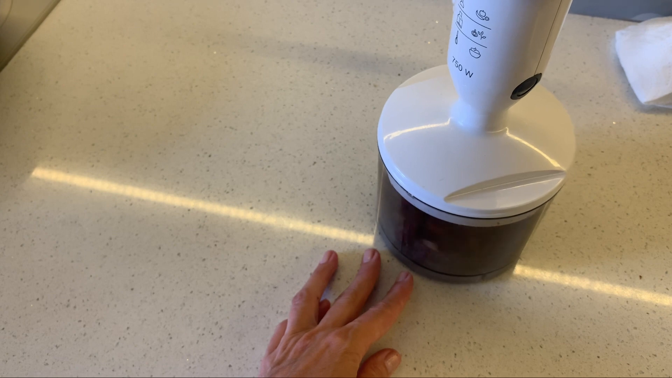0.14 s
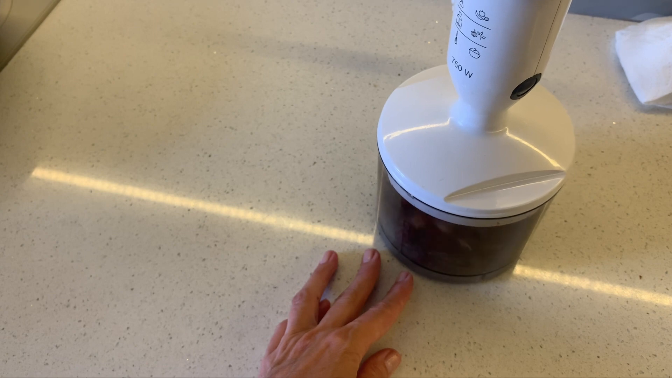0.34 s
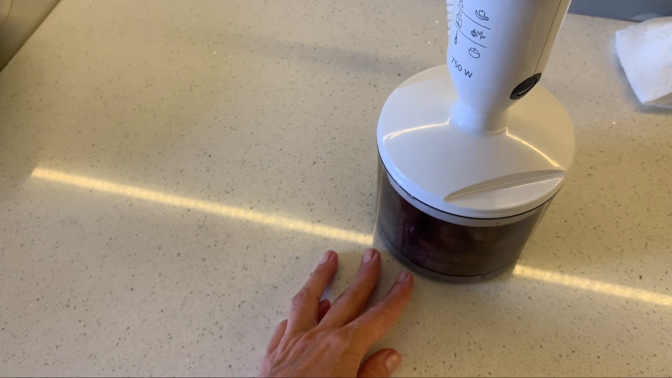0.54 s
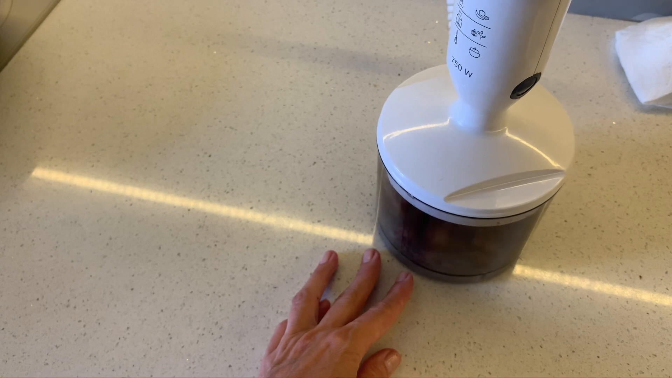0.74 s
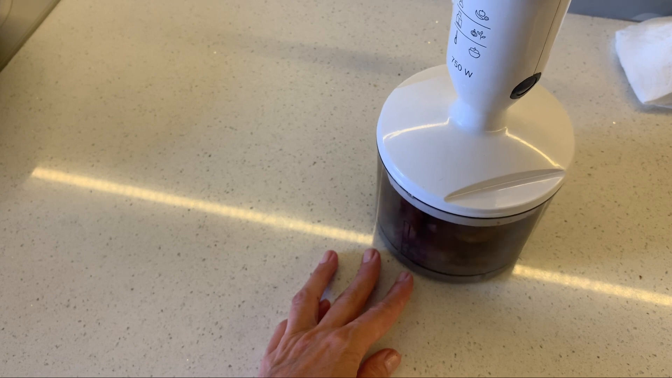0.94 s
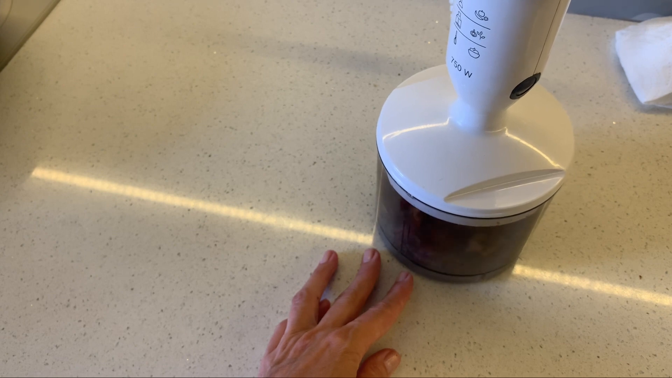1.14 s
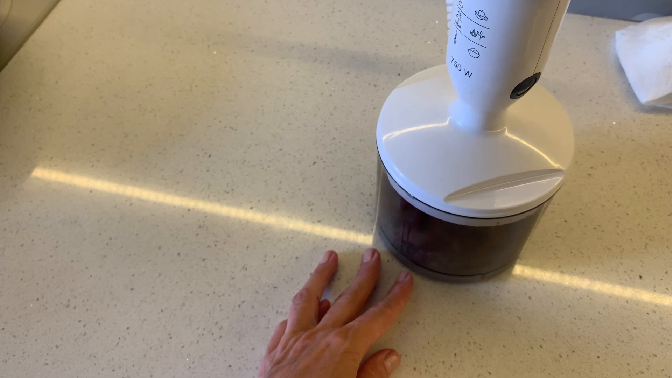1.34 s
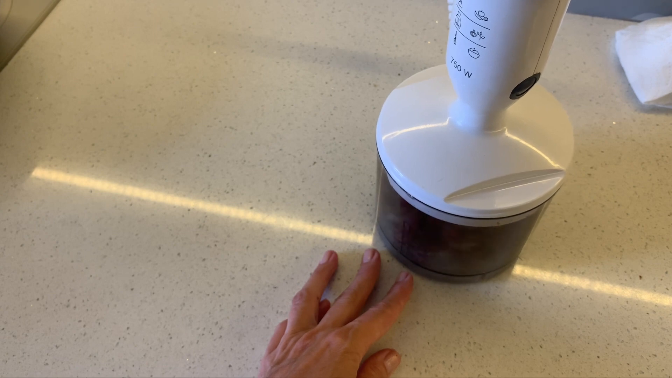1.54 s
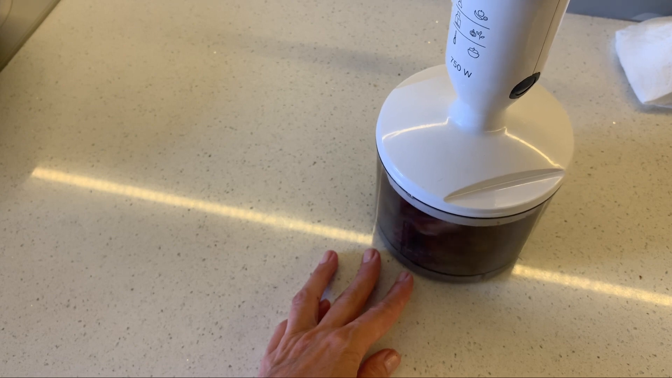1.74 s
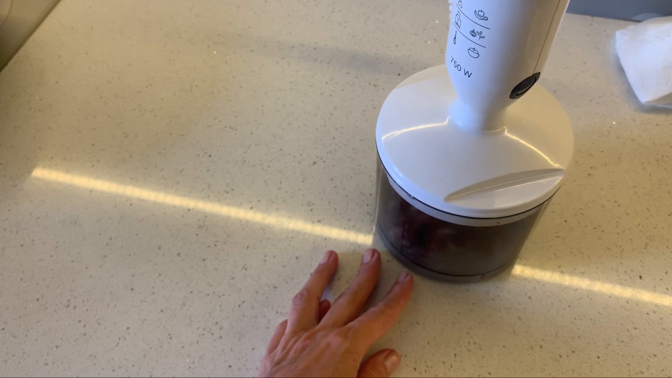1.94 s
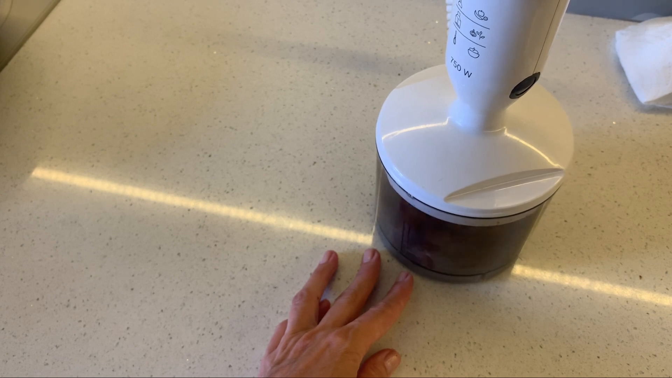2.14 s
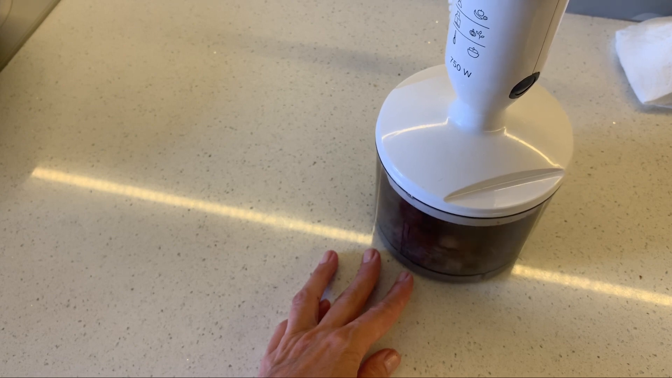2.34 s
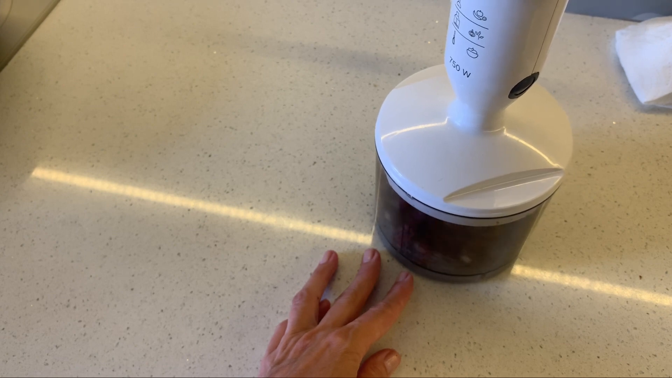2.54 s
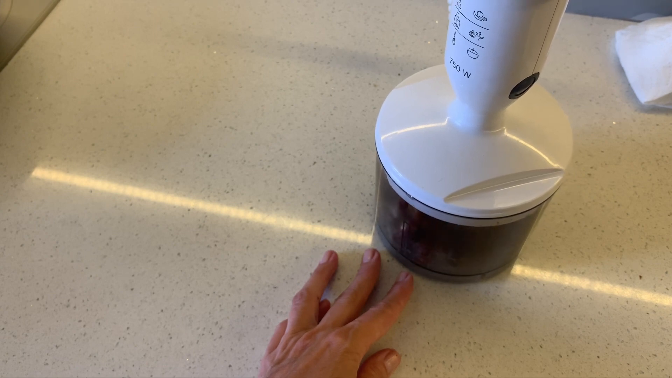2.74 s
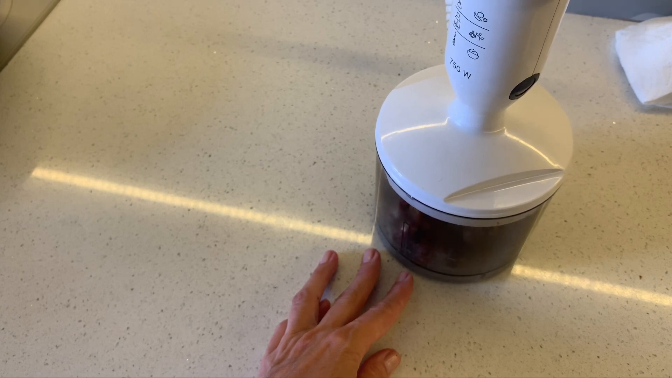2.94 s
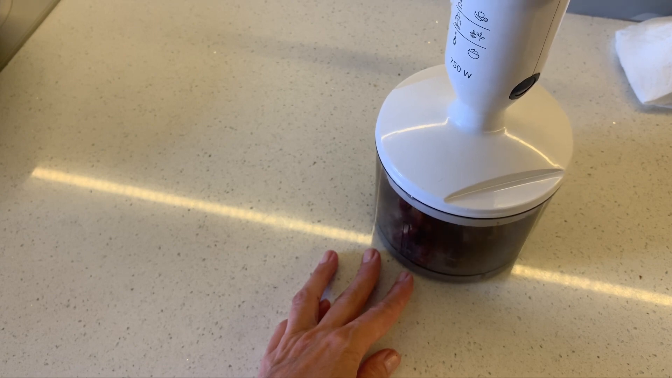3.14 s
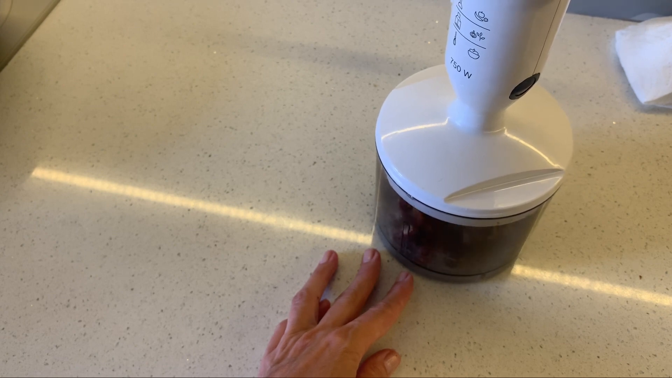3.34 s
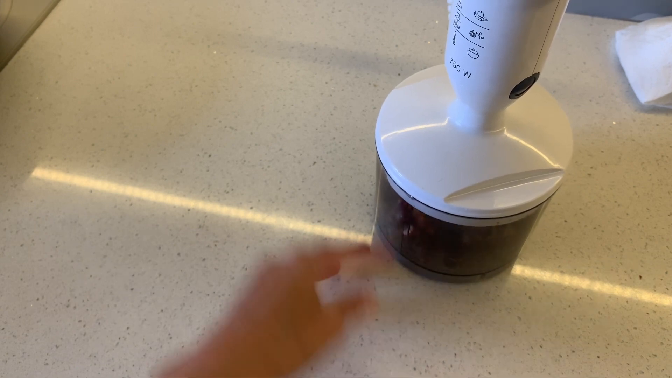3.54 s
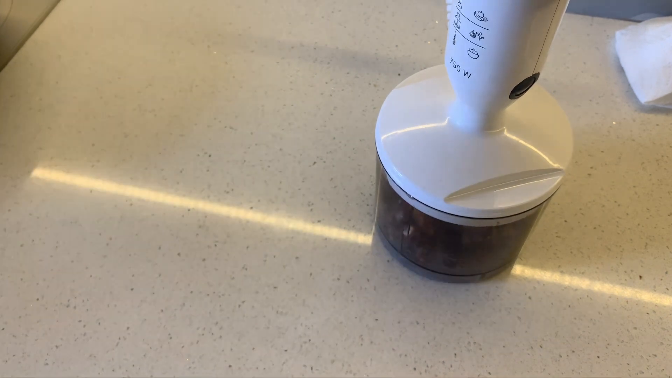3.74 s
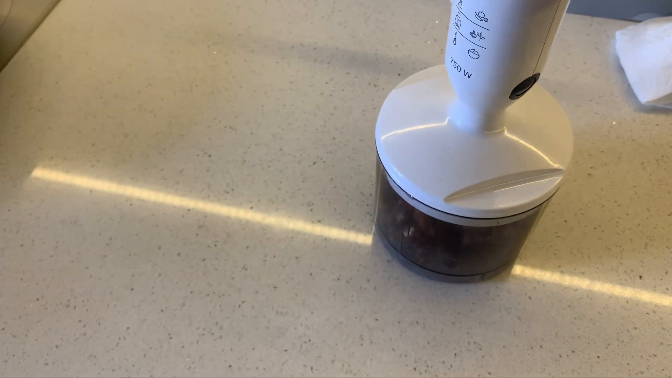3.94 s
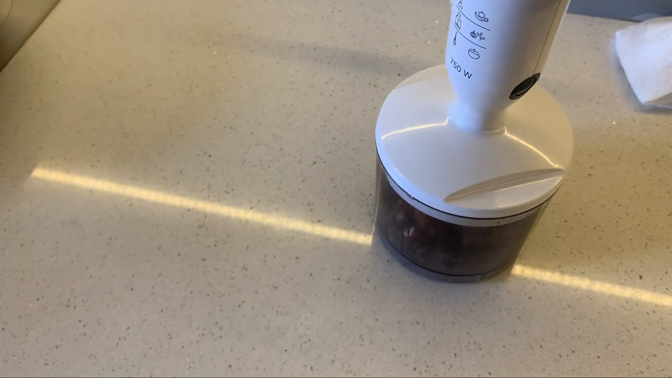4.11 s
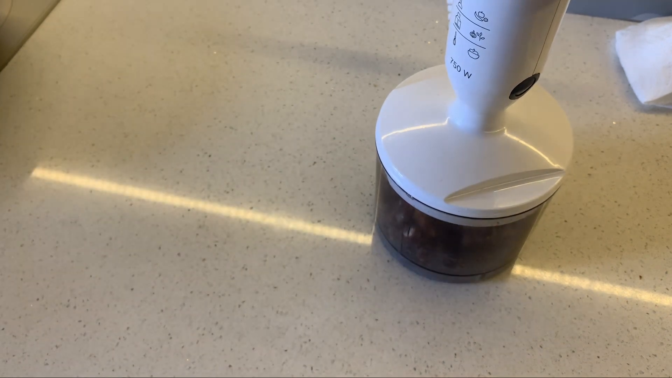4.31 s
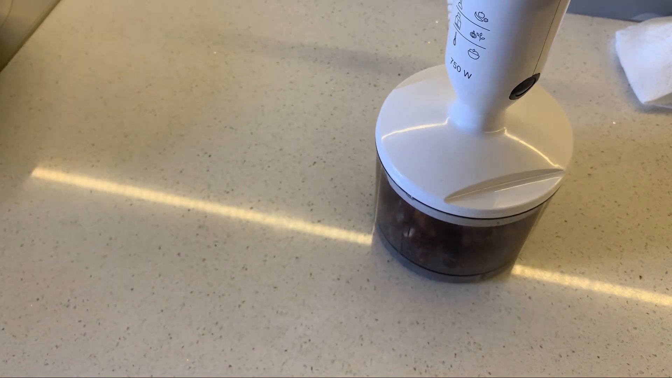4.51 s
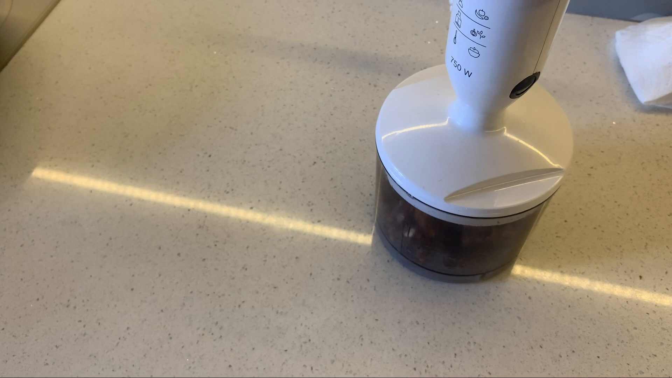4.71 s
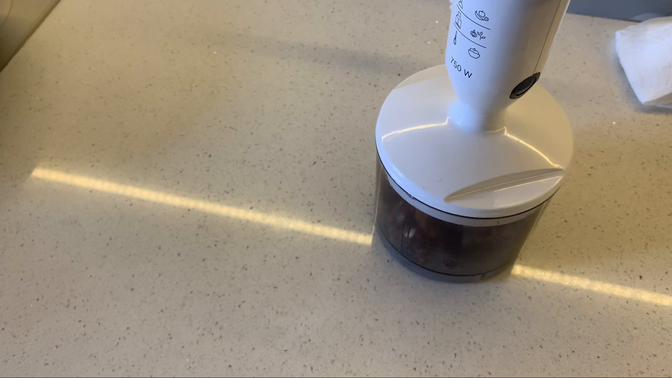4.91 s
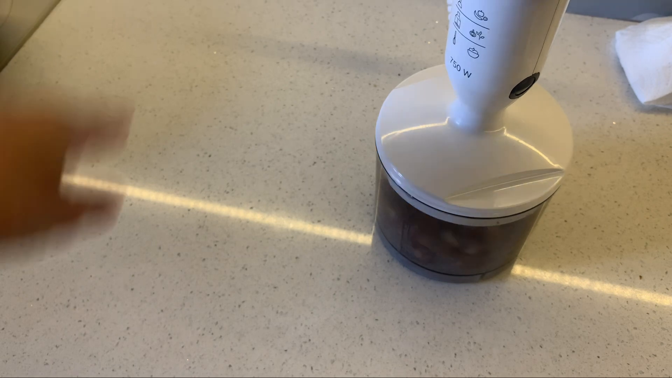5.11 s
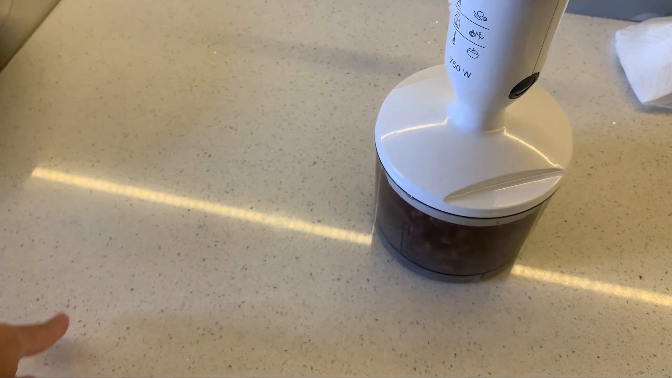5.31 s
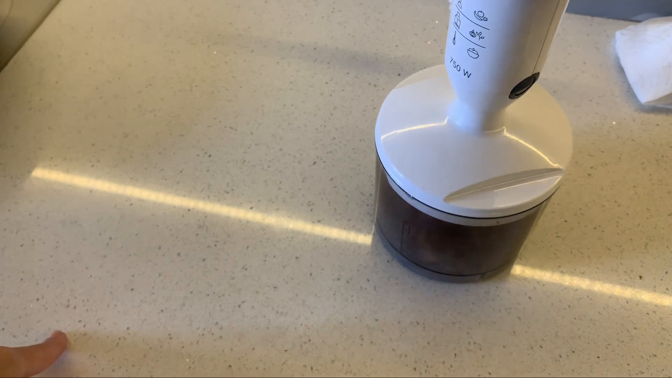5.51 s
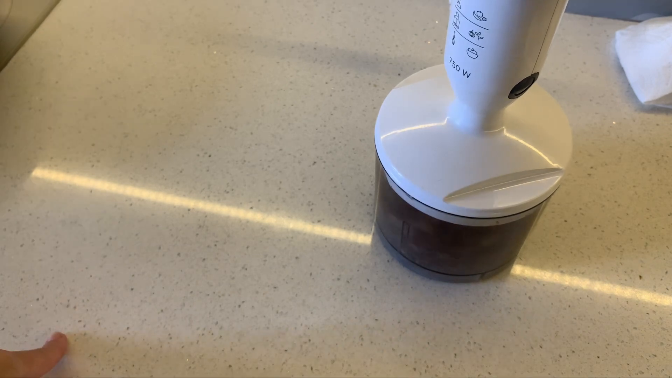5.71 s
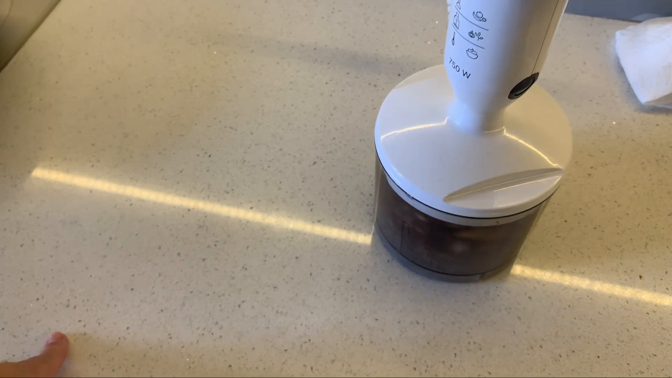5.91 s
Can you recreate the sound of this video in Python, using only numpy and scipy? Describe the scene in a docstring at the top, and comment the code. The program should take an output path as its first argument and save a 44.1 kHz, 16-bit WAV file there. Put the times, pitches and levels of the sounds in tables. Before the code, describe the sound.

Already running, a hand blender with a chopper bowl growls and hums on a stone worktop, sticky fruit pattering and hard pieces knocking the plastic wall. After about two and a half seconds it cuts off quickly into quiet room tone, with a soft bump and faint handle rubs and clicks. At five seconds it snaps on again and chops to the end. Close stereo microphone in a small kitchen.

```python
"""In a quiet kitchen a hand blender chops dates in a plastic bowl on a stone worktop: burst, pause, burst.
The motor hums at twice the mains rate as a few sines, and its brushes and air hiss as pulsing noise.
The blade throws crumbs, random pushes that ring the bowl's modes; hard pieces knock with tock, ring and crack.
Stiff plastic clicks, ringing the latch. In the pause the brushes whisper out, the worktop is bumped and a
grip shifts on the handle. Dull noise, a low drone and faint tones make the room."""
import sys
import numpy as np
from scipy import signal
from scipy.fft import rfft, irfft, next_fast_len
from scipy.io import wavfile
from scipy.ndimage import uniform_filter1d

SR = 44100
rng = np.random.default_rng(int(sys.argv[2]) if len(sys.argv) > 2 else 0)


def wav_record(signal):
    """Record a signal, one row per channel, as 16-bit PCM in the file named by sys.argv[1]."""
    frames = np.transpose(np.atleast_2d(signal))
    bounded = np.clip(frames, -1, 1)
    # unit amplitude maps onto the largest positive 16-bit level
    quanta = np.round(bounded * 32767).astype(np.int16)
    wavfile.write(sys.argv[1], SR, quanta)


N = 267246
TIME = np.arange(N) / SR
HUM_HZ = 100

# Switch held. Each row: on in seconds (the first precedes time 0), off in seconds.
BURSTS = [(-.11, 2.537), (5.011, 6.21)]
# Hard pieces hitting the bowl. Each row: start in seconds, level in dB, pitch of the spot struck in Hz,
# lid ring in dB and crack in dB, both relative to the knock.
KNOCKS = [(.043, -43, 1400, -24, -17), (0.098, -55, 1070, -16, -12), (0.129, -32.5, 1700, -20, -12),
          (0.1431, -29, 1450, -11.5, -7), (0.1449, -34, 1110, -24, -16), (0.4753, -40, 980, -21, -10),
          (.5, -49, 1410, -21, -18), (0.6079, -34, 1390, -18, -24), (0.7603, -38.5, 1610, -24, 0.5),
          (0.927, -45, 1010, -12, -8), (1.0264, -31, 1200, -5.5, -6), (1.0552, -34, 1085, -13, -16),
          (1.0602, -39.5, 1060, -17, -17), (1.166, -37, 1470, -3, -10), (1.169, -31.5, 1054, -6, -8),
          (1.1727, -35.5, 1650, -17, -11), (1.1798, -36, 1093, -22, -18), (1.1907, -34.5, 1450, -24, -23),
          (1.271, -43, 1630, -11, -3), (1.309, -42.5, 1140, -15, -18), (1.4884, -38.5, 1570, -18.5, -12),
          (1.5112, -38, 1640, -13, -9), (1.5234, -30, 1760, -7, -21), (1.5365, -31.5, 1600, -24, -3),
          (1.726, -40, 1050, -14, -22), (1.778, -43, 1400, -28, -7), (1.8583, -37, 1440, -7, -9),
          (1.8647, -33, 1340, -11, -13), (2.099, -38, 1630, -20, -16), (2.1212, -30, 1390, -21, -13),
          (2.2144, -35, 1060, -7, -15), (2.22, -31, 1370, -13, -20), (2.229, -35.5, 1270, -27, -6),
          (2.3209, -38, 1080, -7.5, -11), (2.4619, -38, 970, -16, -20), (2.4806, -39, 1560, -8, -20),
          (2.488, -37, 1540, -22, -16), (2.4957, -35, 1030, -24, -15), (2.545, -40, 1550, -24, -20),
          (2.582, -49.5, 1120, -22, -24), (5.0394, -41, 1000, -5, -12), (5.0479, -33, 1300, -2, 2),
          (5.075, -36, 1030, -26, -5), (5.1106, -35.5, 1370, -24, -4), (5.201, -35, 1400, -23, -19),
          (5.219, -41, 1150, -19, -16), (5.281, -34.5, 1060, -26, -16), (5.3277, -29.5, 1100, -7.5, -16),
          (5.3517, -39.5, 1150, -21, -8), (5.387, -39.5, 1010, -9, -5), (5.501, -28.5, 1620, -10, 0.5),
          (5.5087, -32.5, 1330, -7, -15), (5.522, -37, 1560, -28, -14), (5.586, -40.5, 1580, -21, -10),
          (5.7885, -37, 1640, -34, -12), (5.8617, -37, 1145, -20, -6.5), (5.911, -28.5, 1220, -6, -0.5),
          (5.9148, -38.5, 2080, 1, 5), (5.9708, -34.5, 1450, -25, -18)]
# Bowl modes. Each row: frequency in Hz, width in Hz before damping, relative level in dB.
BOWL = [(504, 110, -12), (947.7, 55, 1), (988.5, 69, -1), (1079.5, 36, 2.5), (1156, 50, -2.5),
        (1206, 32, 1.5), (1277, 37, -4), (1418, 35, 7), (1587.6, 63, 4.5), (1673.4, 33, 4.5),
        (1780, 70, -3.5), (1930, 110, -3.5), (2150, 110, -11), (2392, 37, -4), (2570, 53, -5.5),
        (2980, 140, -11), (3456, 34, -6.5), (3736, 33, -32.5), (4340, 43, -13), (5500, 41, -30.5),
        (6960, 190, -17)]


def undb(db):
    """Decibels to amplitude gain."""
    return 10 ** (np.asarray(db) / 20)


def unit(x):
    """Scale to rms 1."""
    return x / np.sqrt(np.mean(x ** 2))


def burst(ring, length_s):
    """Scale a two-channel ring to the energy of rms 1 held for length_s."""
    return ring / np.sqrt(np.sum(ring ** 2) / (2 * length_s * SR))


def colour(x, points):
    """Causal minimum-phase filter whose gain follows (Hz, dB) points."""
    hz, db = np.transpose(points)
    size = 2 * next_fast_len(x.shape[-1] // 2 + 2048)
    freqs = np.maximum(np.fft.rfftfreq(size, 1 / SR), 1)
    gain_db = np.interp(np.log(freqs), np.log(hz), db)
    # fold the cepstrum onto positive time
    cepstrum = irfft(np.log(undb(gain_db)), size)
    cepstrum[1:size // 2] *= 2
    cepstrum[size // 2 + 1:] = 0
    response = np.exp(rfft(cepstrum))
    return irfft(rfft(x, size) * response, size)[..., :x.shape[-1]]


def pair(size, side_db):
    """Left and right noise: a shared part and a part of opposite sign."""
    mid, side = rng.standard_normal((2, size))
    return unit(mid + undb(side_db) * np.array([side, -side]))


def pan(left_db):
    """Left and right gains, left_db apart."""
    return undb(np.array([[left_db], [-left_db]]) / 2)


def from_right(x, lag_samples=8):
    """The blender's treble reaches the left channel a few samples late."""
    return np.array([np.roll(x[0], lag_samples), x[1]])


def walk(rate):
    """Smooth random drift of rms 1, about rate new values per second."""
    k = int(SR / rate)
    steps = np.repeat(rng.standard_normal(N // k + 1), k)
    return unit(uniform_filter1d(uniform_filter1d(steps, k), k)[:N])


def add(out, s, sound):
    """Mix a sound in at time s."""
    i = int(s * SR)
    out[:, i:i + sound.shape[1]] += sound[:, :N - i]


def grains(per_s, scatter_db, size=N):
    """Random little pushes of uneven strength."""
    strength = undb(scatter_db * np.minimum(rng.exponential(size=size), 3.0))
    return (rng.random(size) < per_s / SR) * strength


def near(modes, centre_hz, loss_db):
    """The same modes, weaker by loss_db for each octave away from a centre."""
    return [(hz, width, db - loss_db * abs(np.log2(hz / centre_hz))) for hz, width, db in modes]


def resonate(force, modes, side_db, damping=1, travel_s=.0022):
    """A force rings modes whose sign depends on the spot hit; damping scales their widths."""
    out, hold = 0, 128  # samples before a new spot is drawn
    for hz, width, db in modes:
        shared, side = rng.standard_normal((2, len(force) // hold + 1))
        spot = np.sign(shared) + undb(side_db) * np.array([side, -side])
        spot = np.repeat(spot, hold, axis=1)[:, :len(force)]
        ring = signal.lfilter(*signal.iirpeak(hz, hz / (width * damping), SR), force * spot)
        # bending waves run round the wall before they radiate, the low ones more slowly
        late = int(rng.random() * travel_s * SR * np.sqrt(BOWL[1][0] / hz))
        out = out + undb(db) * np.roll(ring, late, axis=1)
    return out


def shifting(force, modes, side_db, damping, per_s, sway_db, bend):
    """Fruit sticks to the wall and peels off, so each mode swells, fades and bends in pitch on its own."""
    out = 0
    for mode in modes:
        lag_s = bend * walk(per_s) / per_s
        ring = resonate(force, [mode], side_db, damping)
        bent = np.array([np.interp(TIME - lag_s, TIME, side) for side in ring])
        out = out + bent * undb(sway_db * walk(per_s))
    return out


def housing(x, ring_s=0.0069, ring_db=-9, size=1024):
    """The stiff plastic housing adds a short ring of many close resonances, made as decaying noise."""
    ring = rng.standard_normal(size) * np.exp(-TIME[:size] / ring_s)
    response = signal.unit_impulse(size) + undb(ring_db) * ring / np.linalg.norm(ring)
    return signal.fftconvolve(x, response[None] / np.linalg.norm(response), axes=1)[:, :N]


def kitchen(air_db=-69.5):
    """Dull room noise, most alike left and right at the bottom, with a low drone and wavering faint tones."""
    # Each row: frequency in Hz, relative noise level in dB per Hz.
    air_spectrum = [(20, -29), (30, -13), (45, -5.5), (70, -0.5), (92, -7), (124, -24.5), (175, -10.5),
                    (240, -9), (350, -17), (570, -18.5), (1100, -21.5), (2200, -33.5), (3500, -44.5),
                    (5500, -59.5), (15000, -66.5)]
    # Steady drone. Each row: frequency in Hz, level in dB.
    drone_partials = [(75.4, -74), (183, -82)]
    # Faint resonances. Each row: frequency in Hz, width in Hz, level in dB.
    room_tones = [(410, 20, -94), (562, 17, -83.5), (1090, 25, -87.5), (1465, 34, -94)]
    mid, side = colour(rng.standard_normal((2, N)), air_spectrum)
    side = colour(side, [(30, -15.5), (60, -4.5), (200, -10.0), (600, 3.0), (2000, 2.0)])
    out = (mid + np.array([side, -side])) / mid.std() * undb(air_db + 0.46 * walk(2.3))
    for hz, db in drone_partials:
        level = undb(db + 1.1 * walk(6.9))
        out = out + level * unit(np.sin(2 * np.pi * hz * TIME + 0.3 * walk(3.8)))
    for hz, width, db in room_tones:
        tone = signal.lfilter(*signal.iirpeak(hz, hz / width, SR), pair(N, side_db=-6.5))
        out = out + unit(tone) * undb(db + 1.5 * walk(3.9))
    return out


def running(rise_s, coast_s):
    """The motor grips at once, a short ramp; the sticky fruit stops it quickly, an exponential fall."""
    out = 0
    for on, off in BURSTS:
        out = out + np.clip((TIME - on) / rise_s, 0, 1) * np.exp(-np.maximum(TIME - off, 0) / coast_s)
    return out


def load(stir_rise_s=0.013, stir_fall_s=0.037, stir_db=-17.5):
    """Churning level in dB: fruit round the blade, plus a swell of crumbs for every lump and hard piece."""
    # How thickly fruit lies round the blade, one curve per burst. Each row: time in seconds, level in dB.
    fill = [
        [(0, -51), (.19, -49.5), (.26, -57.5), (.33, -53.5), (.45, -56), (.58, -52), (.72, -50.5), (1.0, -51),
         (1.13, -50), (1.25, -52.5), (1.43, -55), (1.58, -49.5), (1.66, -55), (1.78, -51.5), (1.95, -53.5),
         (2.28, -50), (2.412, -52), (2.54, -51.5)],
        [(5.02, -50.5), (5.1, -49), (5.19, -44.5), (5.26, -48.5), (5.42, -44.5), (5.48, -54), (5.57, -53),
         (5.64, -50.5), (5.84, -50.5), (5.95, -51), (6.05, -52)],
    ]
    # The blade drags a soft lump round the wall. Each row: time in seconds, level in dB.
    lumps = [(0.042, -55), (.098, -50.5), (0.325, -48), (0.507, -44.5), (.662, -56), (0.869, -46.5),
             (1.213, -50.5), (1.317, -42.5), (1.712, -46.5), (2.08, -47.5), (2.51, -48.5), (5.104, -41),
             (5.168, -55), (5.203, -43)]
    power = undb(np.interp(TIME, *np.vstack(fill).T)) ** 2
    stirred = [(row[0], row[1] + stir_db) for row in KNOCKS]
    for s, db in lumps + stirred:
        age = TIME - s
        swell = np.exp(-np.abs(age) / np.where(age < 0, stir_rise_s, stir_fall_s))
        power = power + (undb(db) * swell) ** 2
    return 10 * np.log10(power)


def churn(sweep, crumbs_per_s=430, scatter_db=3.0, lump_db=1.37, patter_db=-7.0):
    """Each blade pass sprays soft crumbs, unevenly heavy; the wall rings, and patters where fruit deadens it."""
    crumbs = grains(crumbs_per_s * sweep / sweep.mean(), scatter_db) * undb(lump_db * walk(72))
    modes = near(BOWL, BOWL[0][0], loss_db=1.13)
    wall = shifting(crumbs, modes, side_db=-7.0, damping=.6, per_s=20, sway_db=2.5, bend=.007)
    patter = resonate(crumbs, modes, side_db=-1.5, damping=2.15, travel_s=.001)
    both = unit(wall) + unit(patter) * undb(patter_db)
    return unit(colour(both, [(300, -2.5), (550, 4), (760, -3), (950, -0.5)])) * pan(.5)


def hum(waver_db=1.46):
    """The motor body shakes at twice the mains rate, a little unsteadily under load."""
    # Magnetic hum. Each row: multiple of the hum rate, relative level in dB.
    harmonics = [(1, 3), (2, -23), (3, -18.5)]
    phase = 2 * np.pi * HUM_HZ * TIME + 0.11 * walk(4.8)
    tone = unit(sum(undb(db) * np.sin(k * phase) for k, db in harmonics))
    return tone * undb(waver_db * walk(32)) * pan(-2.2)


def rumble(sweep, depth=0.55):
    """Gears and the lurching blade shake the bowl on the worktop; the deepest part is most alike left and right."""
    # Each row: frequency in Hz, relative noise level in dB per Hz.
    spectrum = [(25, -48.5), (44, -5), (58, -13), (85, 0), (130, -6), (165, -0.5), (205, -0.5), (248, 4.5),
                (330, -1.5), (430, -7.5), (520, -7.5), (660, -13.5), (780, -14.5), (1100, -54)]
    lurching = rng.standard_normal((2, N)) * (1 + depth * unit(sweep))
    mid, side = colour(lurching, spectrum)
    side = colour(side, [(100, -19), (300, -8.5), (600, 0.0)])
    return unit(mid + np.array([side, -side])) * pan(-0.61)


def thuds(sweep, shoves_per_s=340, scatter_db=2.6):
    """The blade shoves the sticky mass about, and the bowl growls on its foot."""
    # Loaded bowl and motor rocking. Each row: frequency in Hz, width in Hz before damping, relative level in dB.
    foot = [(163.7, 18, -1.5), (207, 23, -7), (249.6, 32, 1.5), (300.3, 22, -1.5), (353, 24, 1),
            (422, 20, -4.5), (514, 47, -4.5), (634, 55, -8)]
    shoves = grains(shoves_per_s * sweep / sweep.mean(), scatter_db)
    growl = shifting(shoves, foot, side_db=-12.5, damping=0.62, per_s=12, sway_db=1.5, bend=.02)
    return unit(growl) * pan(-2.0)


def hiss(sweep, flicker_db=1.4, mains_depth=.19, blade_depth=0.078):
    """Brushes and cooling air hiss from the motor housing, pulsing with the current and the blade."""
    # Each row: frequency in Hz, relative gain in dB.
    spectrum = [(500, -22.5), (1000, 3), (2400, 5.5), (2900, -7.5), (3600, 1.5), (5000, -3.5), (6600, -1.5),
                (8000, -8), (11000, -3), (13500, -11.5), (16000, -6.5)]
    mains_pulse = 1 + mains_depth * np.sin(2 * np.pi * HUM_HZ * TIME)
    blade_pulse = 1 + blade_depth * sweep / sweep.std()
    air = pair(N, side_db=-29.5) * mains_pulse * blade_pulse * undb(flicker_db * walk(250))
    return from_right(unit(colour(housing(air), spectrum))) * pan(-1.4)


def flex(t, hz, swell_s=0.001, spread_rad=0.61):
    """The struck patch of wall swings for a few cycles, a little out of step left and right."""
    skew = spread_rad * rng.standard_normal() * np.array([[1], [-1]])
    return t / swell_s * np.exp(-t / swell_s) * np.sin(2 * np.pi * hz * t + skew)


def blows(s, count=2, gap_s=0.0058, jitter_share=.14, first_db=-11.5, loss_db=6, scatter_db=5.5):
    """A knock and its weaker rebounds about once a blade pass: (s, dB relative to the knock)."""
    gap, scatter = rng.standard_normal((2, count))
    times = s + np.cumsum(gap_s * (1 + jitter_share * gap))
    levels = first_db - np.arange(count) * loss_db + scatter_db * scatter
    return [(s, 0), *zip(times, levels)]


def knocks(crack_s=0.0023, snap_s=0.0019, bowl_db=-0.5, focus_db=7.5, size=4096):
    """A hard piece strikes: the spot gives a pitched tock, bowl and lid ring on, the piece snaps with a crack."""
    # Stiff lid. Each row: frequency in Hz, width in Hz, relative level in dB.
    lid_modes = [(2117, 160, -1.5), (2360, 160, 3.5), (3583, 65, 4), (3760, 88, -10), (4320, 81, -10),
                 (5494, 84, -6), (6500, 140, -17.5)]
    # Colour of the bowl's ring. Each row: frequency in Hz, gain in dB.
    knock_tone = [(300, -5), (550, -1.5), (760, 0.5), (970, 5), (1600, -3), (2400, 6.5), (3000, -8),
                  (3700, -5.5), (4500, -21), (6500, -16), (9000, -33), (16000, -19.5)]
    # Each row: frequency in Hz, relative gain in dB.
    crack_spectrum = [(600, -26), (2000, 4.5), (3700, 1.5), (4800, -5.5), (6300, 3), (8000, -15.5),
                      (11000, -13), (16000, -32)]
    body, lid, crack = np.zeros((3, 2, N))
    t, tap = TIME[:size], signal.unit_impulse(size)
    for start, db, spot_hz, lid_db, crack_db in KNOCKS:
        lid_ring = resonate(tap, lid_modes, side_db=-7.5, travel_s=0.0011)
        add(lid, start, burst(lid_ring, snap_s) * undb(db + lid_db))
        modes = near(BOWL, spot_hz, focus_db)  # those near the spot's pitch ring most
        ring = colour(resonate(tap, modes, side_db=-11.5, damping=1.8, travel_s=0.0022), knock_tone)
        tock = burst(flex(t, spot_hz), snap_s) + burst(ring, snap_s) * undb(bowl_db)
        tock = burst(tock, snap_s)
        for s, blow_db in blows(start):
            add(body, s, tock * undb(db + blow_db))
            snap = pair(size, side_db=-1.5) * np.exp(-t / crack_s)
            add(crack, s, snap * undb(db + blow_db + crack_db))
    crack = from_right(colour(housing(crack), crack_spectrum))
    return body * pan(0.53) + lid * pan(-0.49) + crack * pan(-2.0)


def clicks(focus_db=6.0, ring_s=0.0023, size=8192):
    """Small, bright ticks of the plastic handle and its switch set the latch ringing."""
    # Each row: start in seconds, level in dB before colouring, tick decay in seconds,
    # latch ring relative to the tick in dB, its pitch in Hz.
    click_rows = [(0.073, -47, 0.0044, -3, 9000), (0.119, -45, 0.00083, -8, 10000),
                  (1.125, -48, .005, -16, 5000), (1.357, -46.5, 0.0032, -6, 6900),
                  (3.9367, -73, 0.027, 9.5, 1500), (4.166, -65, 0.005, 3, 2800),
                  (4.7523, -81, 0.0038, 3, 7200), (5.012, -45.5, 0.0034, -12, 10000),
                  (5.089, -46.5, 0.0046, -4, 5000), (5.294, -45.5, .003, -8, 11000)]
    # Latch locking handle to lid. Each row: frequency in Hz, width in Hz, relative level in dB.
    latch_modes = [(1421, 26, 2.5), (1590, 35, -1.5), (1970, 44, 1.5), (2400, 50, -7), (2827, 90, -6.5),
                   (3320, 112.6, -2.5), (3940, 143, -2), (5090, 110, -4), (7040, 130, -5.5),
                   (10000, 150, -2.5), (10600, 90, -7.5), (11920, 150, -8.5)]
    ticks, latch = np.zeros((2, 2, N))
    t = TIME[:size]
    for s, db, decay_s, ring_db, hz in click_rows:
        add(ticks, s, pair(size, side_db=-5.5) * np.exp(-t / decay_s) * undb(db))
        modes = near(latch_modes, hz, focus_db)
        ring = resonate(signal.unit_impulse(size), modes, side_db=1.5, travel_s=.001)
        add(latch, s, burst(ring, ring_s) * undb(db + ring_db))
    tone = [(500, -4), (2000, 4.5), (4000, 3.0), (7500, -12.0), (11000, 2.0), (16000, -11)]
    return latch + from_right(colour(housing(ticks), tone))


def whisper(db=-88, fade_s=0.27):
    """After the first burst the rotor spins on for a moment, its brushes whispering."""
    age = TIME - BURSTS[0][1]
    air = colour(pair(N, side_db=-6), [(1500, -12.5), (3500, 5), (5000, 1.5), (7500, -8), (10000, -27)])
    return unit(air) * undb(db) * (age > 0) * np.exp(-np.abs(age) / fade_s)


def bump():
    """The heavy worktop answers a soft touch with a few slow cycles."""
    # One row: start in seconds, envelope peak in dB, frequency in Hz, decay in seconds.
    s, db, hz, decay_s = (3.215, -59, 85, .022)
    age = np.maximum(TIME - s, 0)
    envelope = age / decay_s * np.exp(1 - age / decay_s)
    return undb(db) * envelope * np.sin(2 * np.pi * hz * age)


def rubs(rise_s=0.011, fall_s=0.033, slips_per_s=2200, scatter_db=1.5, size=16384):
    """Skin sticks and slips on the handle shell as the grip shifts."""
    # Each row: start in seconds, level in dB, length in seconds, pitch in Hz.
    rub_rows = [(4.064, -83, 0.03, 3800), (4.572, -87.5, 0.033, 4600), (4.788, -79, 0.089, 3900),
                (4.917, -78.5, 0.1, 3600)]
    # Handle shell. Each row: frequency in Hz, width in Hz before damping, relative level in dB.
    shell = [(2500, 230, 4), (2770, 220, 2), (3130, 200, 0.5), (3820, 180, -5), (4600, 140, -2),
             (5140, 150, -3.5), (6260, 250, -9), (6800, 230, -13), (7900, 180, -23.5), (11000, 1500, -30.5)]
    out, t = np.zeros((2, N)), TIME[:size]
    for s, db, length_s, hz in rub_rows:
        slips = grains(slips_per_s, scatter_db, size=size)
        slide = unit(resonate(slips, near(shell, hz, loss_db=3.0), damping=0.99, side_db=-0.5))
        envelope = np.clip(t / rise_s, 0, 1) * np.exp(-np.maximum(t - length_s, 0) / fall_s)
        add(out, s, slide * undb(db) * envelope)
    return out


def room(x, wet_db=-8.5, t60_s=0.35, gap_s=0.0028):
    """Hard worktop and close walls return a short, dull tail: decaying noise after a gap."""
    t = TIME[:SR // 2]
    decay = np.exp(-np.log(1000) * t / t60_s) * np.clip(t / gap_s - 1, 0, 1)
    tail = rng.standard_normal((2, len(t))) * decay
    tail = tail / np.sqrt(np.sum(tail[0] ** 2))
    tail = colour(tail, [(150, -13.0), (900, 4.0), (4000, 4.0), (12000, -10.0)])
    return x + undb(wet_db) * signal.fftconvolve(x, tail, axes=1)[:, :N]


def scene(usual_db=-51.0, rumble_db=-58, thud_db=-56.0, hiss_db=-62.0, rumble_follow=0.73, hiss_follow=0.7,
          blade_hz=142.95):
    """Load drives the churning; shaking and hiss follow it part way. Churning starts and stops fastest."""
    # Motor body on the bowl, one curve per burst. Each row: time in seconds, hum level in dB.
    hum_level = [
        [(0, -54.5), (.32, -53), (.39, -55.5), (.49, -51.5), (1.03, -51), (1.35, -52.5), (1.65, -52),
         (2.12, -50), (2.45, -52), (2.55, -53.5)],
        [(5.03, -58), (5.21, -55.5), (5.45, -52), (5.544, -61), (5.62, -59), (5.774, -59.5), (5.93, -52.5),
         (6.05, -55)],
    ]
    load_db = load()
    effort_db = load_db - usual_db
    hum_db = np.interp(TIME, *np.vstack(hum_level).T)
    passes = np.cumsum(blade_hz * (1 + .024 * walk(11))) / SR  # blade tips past the wall
    sweep = np.exp(-(passes % 1) / .41)  # each pass's push dies away before the next
    chopping = churn(sweep) * undb(load_db) * running(rise_s=0.0043, coast_s=0.022)
    chopping += hiss(sweep) * undb(hiss_db + hiss_follow * effort_db) * running(rise_s=0.018, coast_s=0.042)
    shaking = rumble(sweep) * undb(rumble_db) + thuds(sweep) * undb(thud_db)
    chopping += shaking * undb(rumble_follow * effort_db) * running(rise_s=0.0074, coast_s=0.05)
    humming = hum() * undb(hum_db) * running(rise_s=0.02, coast_s=0.051)
    in_room = room(chopping + knocks() + clicks() + rubs() + whisper())
    return in_room + humming + bump() + kitchen()


def record(dry, top_hz=15900):
    """A steep low-pass cuts the top."""
    return signal.sosfilt(signal.ellip(10, .2, 70, top_hz, fs=SR, output="sos"), dry)


dry = scene()
out = record(dry)
wav_record(out)
```